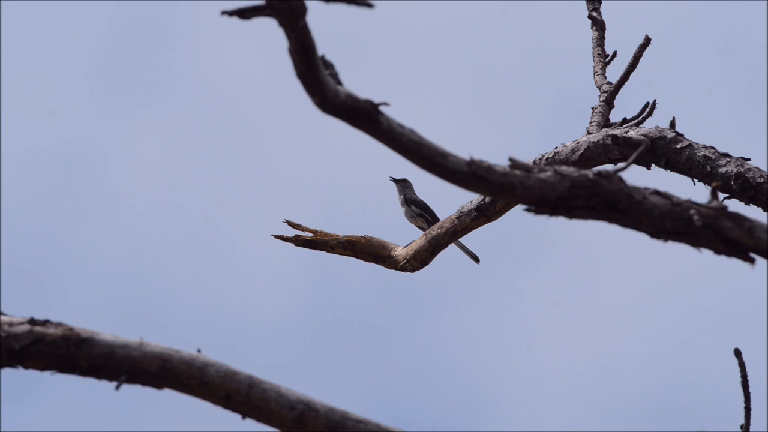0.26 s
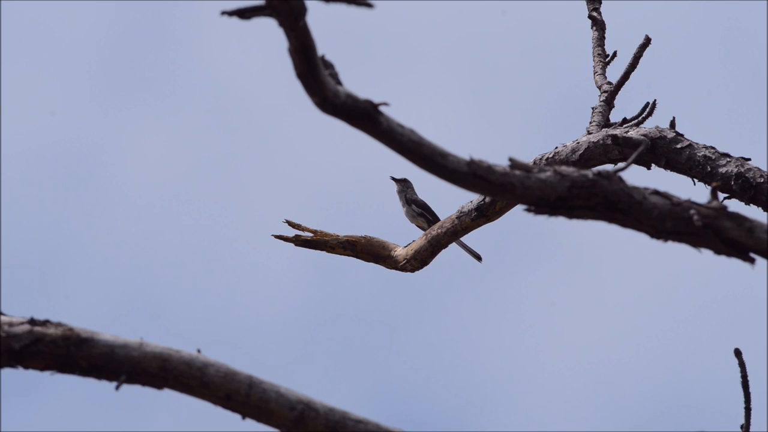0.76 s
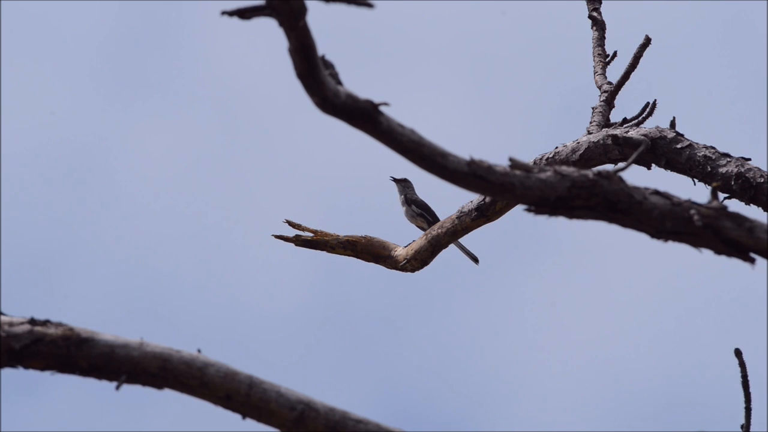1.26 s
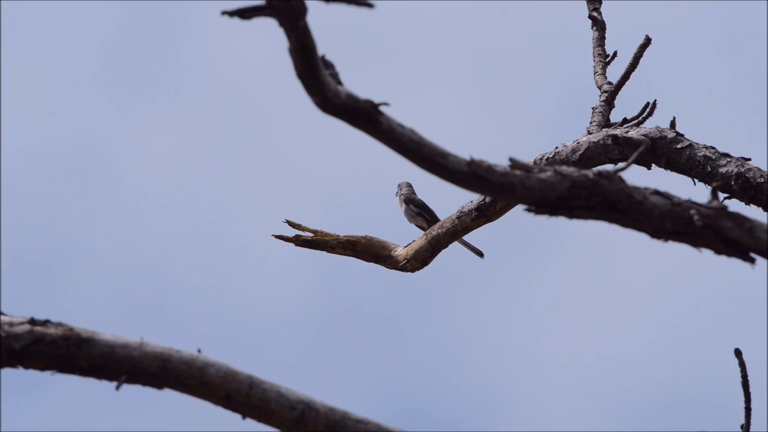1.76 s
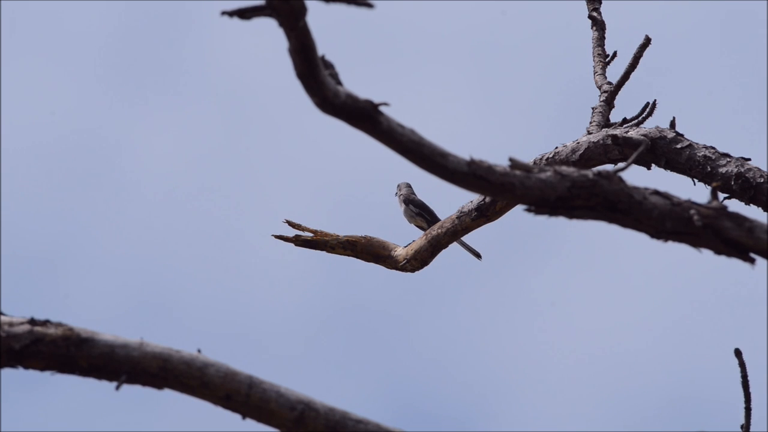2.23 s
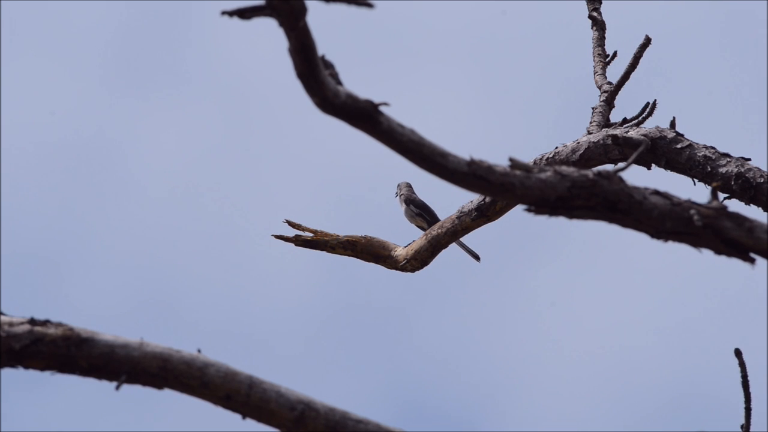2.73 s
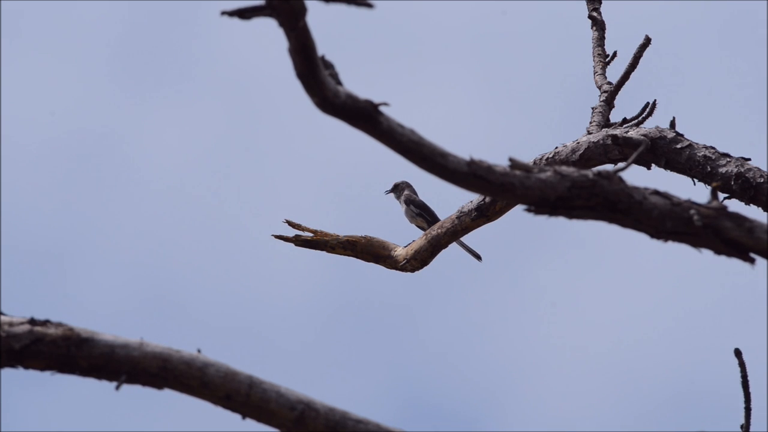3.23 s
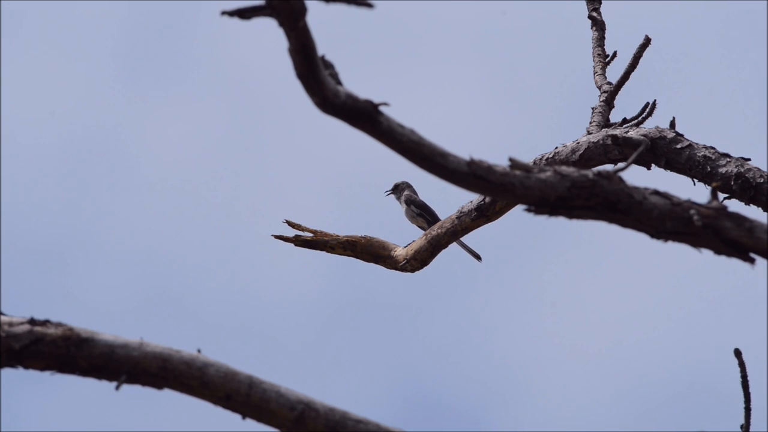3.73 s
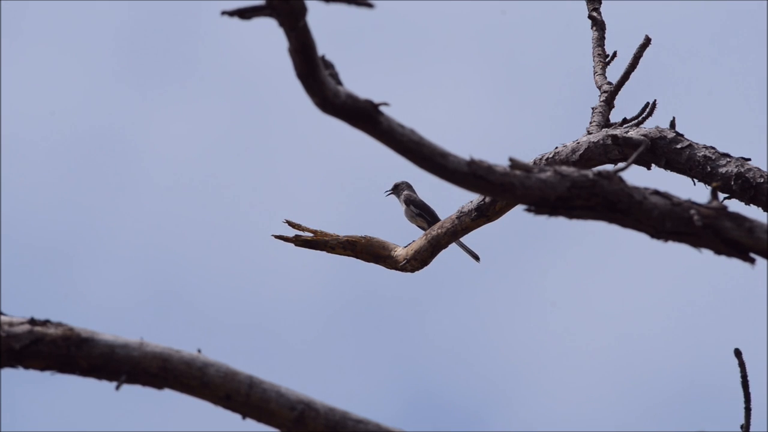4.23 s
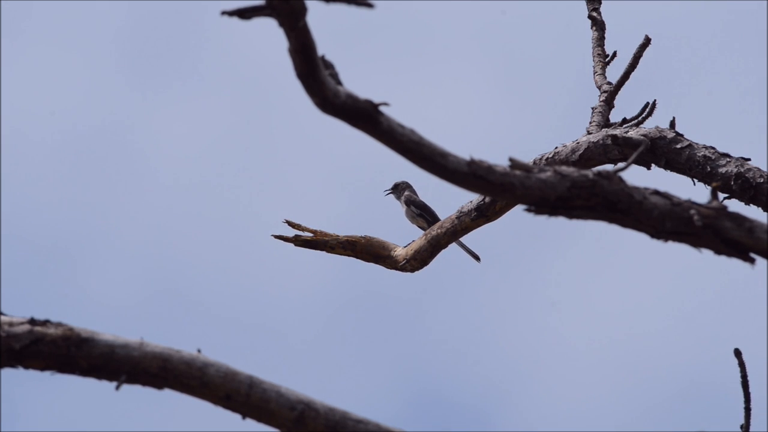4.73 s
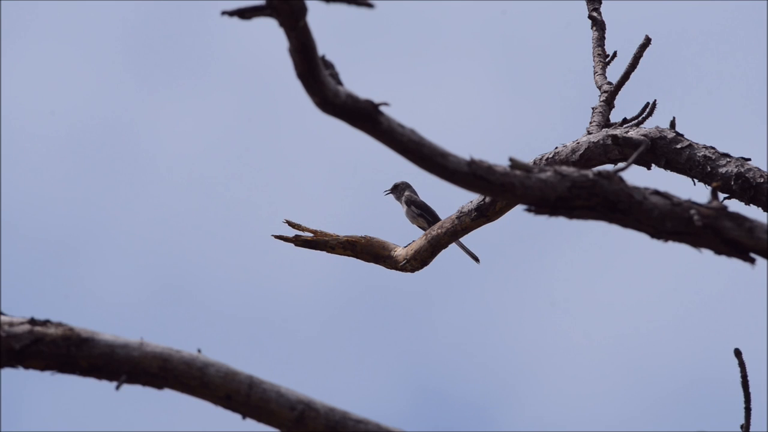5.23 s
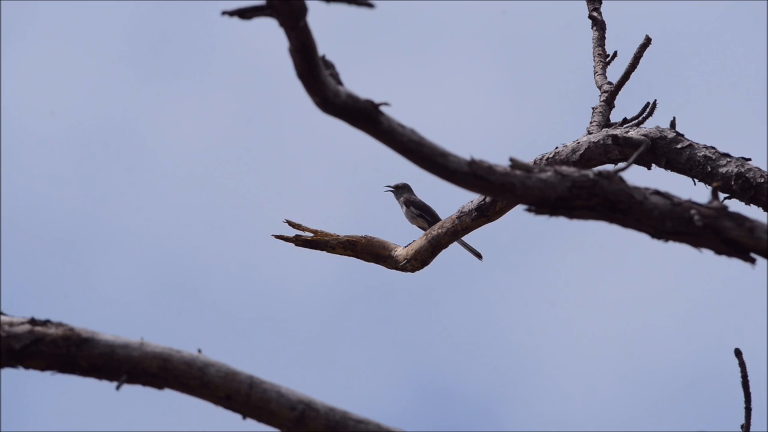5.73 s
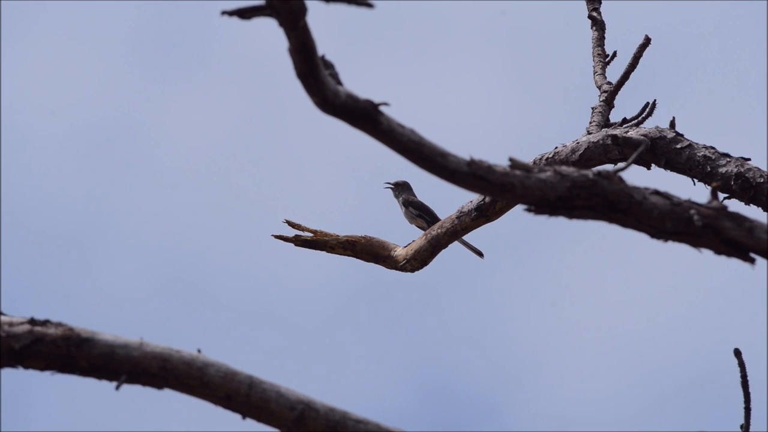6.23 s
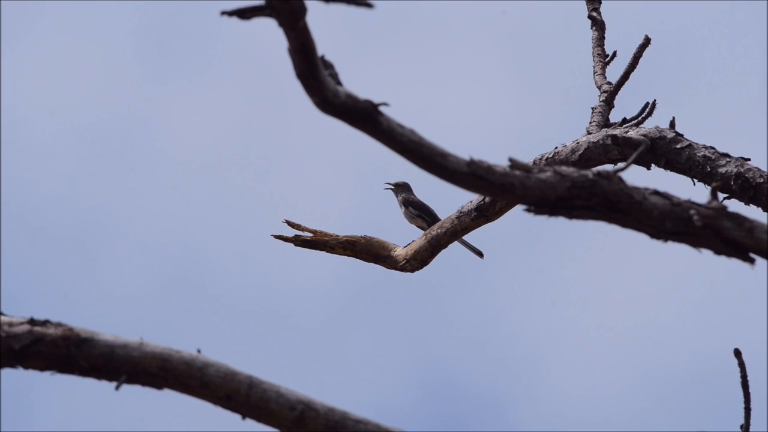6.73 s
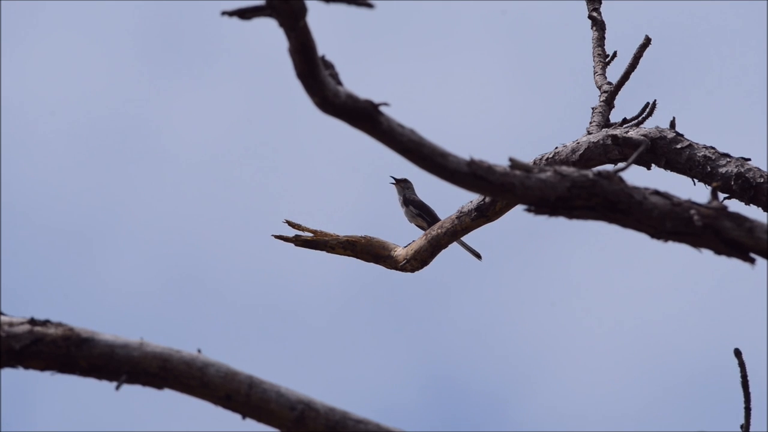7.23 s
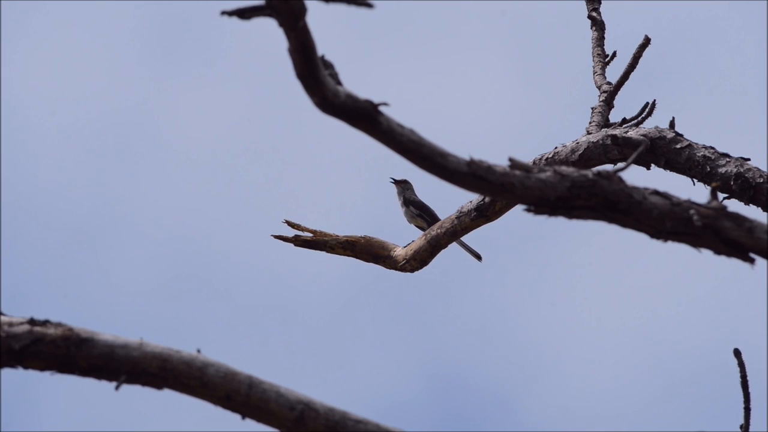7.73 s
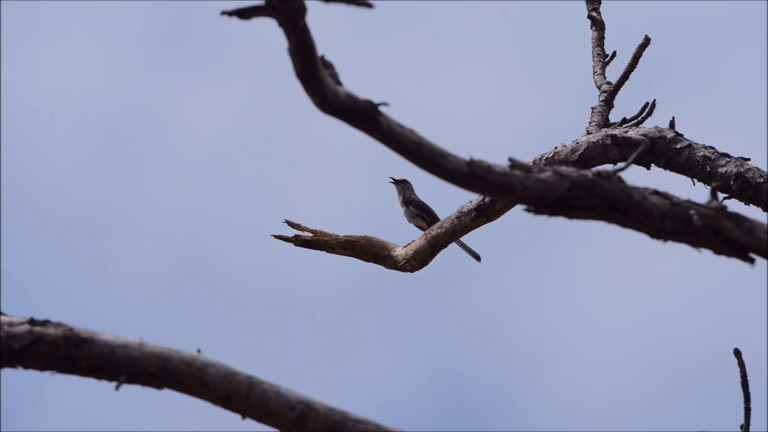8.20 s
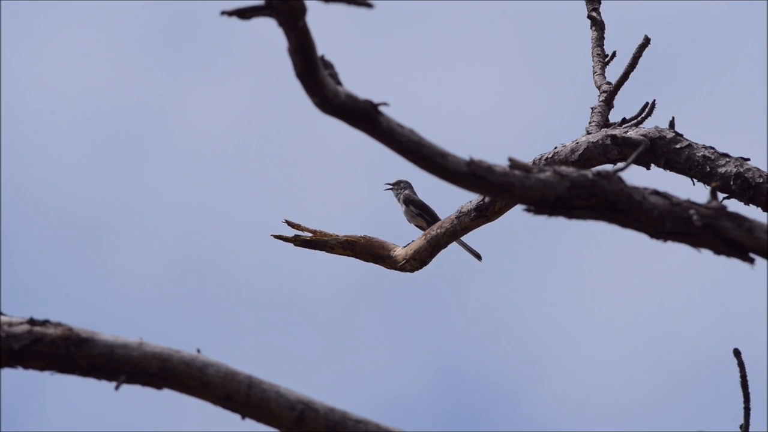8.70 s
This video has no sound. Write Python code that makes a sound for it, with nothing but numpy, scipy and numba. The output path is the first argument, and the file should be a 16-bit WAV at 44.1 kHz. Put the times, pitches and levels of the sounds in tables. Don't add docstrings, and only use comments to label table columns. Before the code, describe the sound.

Rough pulsed bird churrs give way to sliding whistles and harsh tumbling notes over soft leaf hiss, insect scrapes and growing low wind thumps.

```python
import sys
import numpy as np
from scipy import signal
from scipy.fft import rfft, irfft
from scipy.io import wavfile
from scipy.ndimage import uniform_filter1d
from numba import njit

SR = 44100
rng = np.random.default_rng(int(sys.argv[2]) if len(sys.argv) > 2 else 0)


def voltage_ratio(decibels):
    exponent = np.asarray(decibels, float) / 20
    return 10 ** exponent


def put_to_file(sound):
    columns = np.atleast_2d(sound).T
    safe = np.clip(columns, -1, 1)
    whole_steps = np.round(safe * 32767)
    wavfile.write(sys.argv[1], SR, whole_steps.astype(np.int16))


N = 395136


def unit(x):
    return x / np.sqrt(np.mean(x ** 2))


def walk(rate_hz):
    hold = int(SR / rate_hz)
    steps = np.repeat(rng.standard_normal(N // hold + 1), hold)
    return 1.29 * uniform_filter1d(uniform_filter1d(steps, hold), hold)[:N]


@njit
def svf(x, hz, damp):
    low, band, b, l = np.empty(len(x)), np.empty(len(x)), 0., 0.
    for i in range(len(x)):
        g = np.tan(np.pi * hz[i] / SR)
        v = (b + g * (x[i] - l)) / (1 + g * (g + damp))
        low[i], band[i] = l + g * v, damp * v
        b, l = 2 * v - b, l + 2 * g * v
    return low, band


def add(out, x, start_s):
    i = int(start_s * SR)
    a, b = max(i, 0), min(i + len(x), N)
    out[a:b] += x[a - i:b - i]


def syrinx(hz, size, over, rough, third_db=-15.5, high_db=-13):
    phase = 2 * np.pi * (np.cumsum(hz) / SR + rng.random())
    noise = uniform_filter1d(rng.standard_normal((2, len(hz))), int(.0012 * SR))
    shake = rough * noise * np.sqrt(0.00062 * SR)
    upper = np.sin(2 * phase) + voltage_ratio(third_db) * np.sin(3 * phase)
    upper += voltage_ratio(high_db) * (np.sin(4 * phase) + np.sin(6 * phase))
    return size * ((1 + shake[0]) * np.sin(phase) + over * (1 + 5.3 * shake[1]) * upper)


def throat(hz):
    return voltage_ratio(-76 * np.clip(np.log2(2 * hz / 3360), 0, .6))


def strokes(rows, length_s, glide_hz, late, blunt, over, rough, reach=2.7, curve=0.3):
    out, middle_hz = np.zeros(N), np.median(np.transpose(rows)[2])
    variation = np.exp(.08 * rng.standard_normal(len(rows)))
    for (centre_s, db, hz), vary in zip(rows, variation):
        u = np.linspace(0, 1, int(length_s * hz / middle_hz * SR))
        puff = np.abs(np.sin(np.pi * u ** late)) ** blunt
        u = u - .5 ** (1 / late)
        path_hz = hz + glide_hz * (hz / middle_hz) ** reach * vary * (u + curve * u ** 2)
        tone = syrinx(path_hz, voltage_ratio(db) * puff, over(path_hz), rough)
        add(out, tone, centre_s + u[0] * len(u) / SR)
    return out


def glides(rows, bend, rise, fall, rough):
    out = np.zeros(N)
    for start_s, length_s, first_hz, last_hz, db, *over_db in rows:
        u = np.linspace(0, 1, int(length_s * SR))
        hz = last_hz + (first_hz - last_hz) * (1 - u) ** bend
        swell = np.clip(np.minimum(u / rise, (1 - u) / fall), 0, 1)
        size = voltage_ratio(db) * np.sin(np.pi / 2 * swell)
        over = voltage_ratio(over_db[0] if over_db else -40)
        add(out, syrinx(hz, size, over, rough * (first_hz / 3000) ** 2), start_s)
    return out


def held_tone(table):
    s, hz, db = np.transpose(table)
    t = np.arange(s[0], s[-1], 1 / SR)
    waver = walk(57.8)[:len(t)]
    size = np.sqrt(2) * voltage_ratio(np.interp(t, s, db) + 2.4 * waver) * signal.windows.tukey(len(t), .03)
    hz = uniform_filter1d(np.interp(t, s, hz), int(0.0068 * SR)) * (1 + 0.00346 * waver)
    out = np.zeros(N)
    add(out, syrinx(hz, size, voltage_ratio(-3) * throat(hz), .16, third_db=-10), s[0])
    return out


def long_churr(start_s, top_s, period_s, db, top_hz):
    # floor_hz, hook_hz, level_db
    pulses = [(1800, 280, 1), (1733, 260, -.5), (1665, 130, -3.5), (1624, 20, -8.5)]
    # place (0-1), hook_share (0-1), level_db
    hook = [(.14, .25, -5.5), (.4, 0.19, -2.5), (.88, 1, -0.5), (1, 1.05, -16)]
    climb_hz = 476
    drift_hz = 60.2 * (start_s > 3.5)
    rows = [(start_s, top_hz - climb_hz, db - 6), (start_s + .004, top_hz - .85 * climb_hz, db - 7.0),
            (top_s - .004, top_hz - 70, db + 2.0), (top_s, top_hz, db - 5.5)]
    variation = rng.standard_normal((len(pulses), 2))
    for k, ((floor_hz, hook_hz, step_db), vary) in enumerate(zip(pulses, variation)):
        begin_s = rows[-1][0]
        length_s = period_s * (1 if k else .76)
        rows += [(begin_s + place * length_s, floor_hz + drift_hz + share * hook_hz + 20 * vary[0],
                  db + step_db + dip_db + 1.4 * vary[1]) for place, share, dip_db in hook]
    s, hz, level_db = np.transpose(rows)
    t, out = np.arange(s[0], s[-1], 1 / SR), np.zeros(N)
    path_hz = uniform_filter1d(np.interp(t, s, hz), int(0.0027 * SR))
    size = np.sqrt(2) * voltage_ratio(np.interp(t, s, level_db)) * signal.windows.tukey(len(t), .06)
    over = voltage_ratio(-8.5 - 100.32 * np.clip(np.log2(path_hz / 1660), 0, .3))
    add(out, syrinx(path_hz, size, over, 0.13), s[0])
    return out


def long_churrs():
    # start_s, top_s, pulse_period_s, rms_db, top_hz
    calls = [(0.517, 0.541, 0.014, -22.5, 2410), (1.465, 1.487, 0.02, -24.5, 2445),
             (1.604, 1.627, 0.021, -25, 2407), (1.739, 1.761, 0.022, -25.5, 2390),
             (1.882, 1.906, 0.02, -25.5, 2433), (2.302, 2.324, 0.022, -27, 2430),
             (2.45, 2.469, 0.024, -27, 2275), (2.597, 2.622, .022, -25.5, 2300),
             (2.997, 3.016, .023, -26.5, 2400), (3.158, 3.179, 0.024, -27, 2300),
             (3.303, 3.318, 0.026, -25, 2260), (3.689, 3.711, 0.024, -26, 2350),
             (3.848, 3.87, .023, -26.5, 2284)]
    return sum(long_churr(*row) for row in calls)


def quick_churrs():
    # place (0-1), level_db
    shape = [(0, -6), (0.169, -0.5), (.36, 0.5), (.57, 1), (.79, 0.5), (1, -4.5)]
    # start_s, length_s, level_db, lead_hz, body_hz
    calls = [
        (-.008, 0.068, -24, 2400, 2250),
        (.679, .067, -23.5, 2240, 2095),
        (.83, .068, -22.5, 2340, 2120),
        (.982, .068, -24, 2160, 2053),
    ]
    sag_hz = 61.8
    rows = [(s + place * length_s, db + step_db, body_hz - sag_hz * (k - 1) if k else lead_hz)
            for s, length_s, db, lead_hz, body_hz in calls for k, (place, step_db) in enumerate(shape)]
    rows = [row for row in rows if row[0] > 0]
    return strokes(rows, length_s=.017, glide_hz=340, late=1.15, blunt=1.2,
                   over=lambda hz: voltage_ratio(-3) * throat(hz), rough=0.15)


def whistle(start_s, delay_s, stretch, rise_db, accent_db):
    # after_start_s, pitch_hz, level_db
    contour = [(0, 2003, -45), (.022, 2169, -23), (.061, 2363, -17.5), (.078, 2318, -60),
               (.15, 2173, -34.5), (.188, 2097, -27.5), (.24, 1890, -36), (.405, 1675, -42),
               (.418, 1680, -54)]
    break_s, slide_s, slide_hz, accent_s = .09, .188, 2090, .07
    rows = []
    for s, hz, db in contour:
        point_s = start_s + s + delay_s * (s > break_s) + (stretch - 1) * max(s - slide_s, 0)
        point_hz = hz - (stretch - 1) * (slide_hz - hz) * (s > slide_s)
        accent = accent_db * max(1 - abs(s - slide_s) / accent_s, 0)
        rows.append((point_s, point_hz, db + (accent if s > break_s else rise_db)))
    return held_tone(rows)


def whistles():
    # start_s, slide_delay_s, slide_stretch (time and depth), rise_db, slide_accent_db
    calls = [
        (4.445, 0, .98, .5, 0),
        (5.122, 0, 1.02, -.5, -4),
        (5.875, .038, 1.12, 1, 4.5),
    ]
    return sum(whistle(*row) for row in calls)


def turn(drop_s, db, lift, slow):
    # from_drop_s, pitch_hz, level_db, overtone_db
    contour = [(-.125, 1679, -49, -3), (-.095, 1864, -45, -10), (-.07, 1902, -35.5, -10),
               (-.035, 1853, -39.5, -3), (0, 1854, -33.5, 0.5), (.009, 1743, -39, 8.5),
               (.017, 1400, -39.5, 16.5), (.026, 1185, -44.5, 11), (.045, 1028, -54, 11)]
    s, hz, level_db, over_db = np.transpose(contour)
    s = np.where(s > 0, slow * s, s)
    t, out = np.arange(s[0], s[-1], 1 / SR), np.zeros(N)
    size_db = db + np.interp(t, s, level_db) + 1.5 * walk(101)[:len(t)]
    size = np.sqrt(2) * voltage_ratio(size_db) * signal.windows.tukey(len(t), .05)
    path_hz = lift * uniform_filter1d(np.interp(t, s, hz), int(0.0034 * SR))
    second_db = np.interp(t, s, over_db)
    tilt_db = -.8 * (second_db + 4)
    tone = syrinx(path_hz, size, voltage_ratio(second_db), 0.056, third_db=-6 + tilt_db, high_db=-13 + tilt_db / 2)
    add(out, tone, drop_s + s[0])
    return out


def motif(shape, over_db, start_s=0, db=0):
    return [(start_s + s, length_s, first_hz, last_hz, db + peak_db, over)
            for (s, length_s, first_hz, last_hz, peak_db), over in zip(shape, over_db)
            if start_s + s < N / SR]


def tumbles():
    # opening_s, turn_s, level_db, turn_pitch_factor, drop_slowness
    phrases = [
        (6.959, 7.196, -2.2, .965, 1.45),
        (7.749, 7.997, 0, 0.995, 1.15),
        (8.582, 8.862, 0.5, 1.002, 1.25),
    ]
    # delay_s, length_s, first_hz, last_hz, peak_db
    opening = [(0, 0.047, 1553, 1718, -30.5), (.048, 0.013, 1554, 1177, -31),
               (.057, .027, 2340, 2223, -29.5), (.076, 0.04, 3250, 2870, -36),
               (.083, 0.037, 2150, 1910, -42.5)]
    opening_over = [-12.5, -2.5, -20, -18, -25]
    # start_s, length_s, first_hz, last_hz, peak_db
    fan = [(7.232, 0.035, 3360, 2890, -29.5), (7.258, 0.029, 3110, 2730, -32),
           (7.245, .05, 4050, 3700, -42), (7.268, 0.056, 3600, 3110, -30.5), (7.29, .045, 3900, 3500, -37),
           (7.3, 0.068, 2900, 2700, -43), (8.02, 0.071, 3690, 2730, -28), (8.045, .04, 4100, 3600, -38),
           (8.068, .045, 3900, 3070, -31), (8.1, .035, 3950, 3330, -34), (8.105, 0.026, 3310, 2850, -39),
           (8.04, 0.078, 2050, 1640, -42), (8.885, 0.069, 3940, 2810, -26), (8.92, .04, 4270, 3850, -36),
           (8.935, .025, 3720, 3200, -34)]
    # start_s, length_s, first_hz, last_hz, peak_db
    chips = [
        (3.565, 0.016, 3105, 2700, -20.5),
        (3.567, 0.015, 2540, 2410, -25),
        (3.579, 0.017, 2594, 2504, -21),
        (7.25, .047, 2030, 1720, -41),
        (7.89, .045, 3060, 3210, -41),
    ]
    chip_over = [-36, -36, -24, -6, -24]
    rows = motif(chips, chip_over) + [(*row, -22) for row in fan]
    for opening_s, _, db, _, _ in phrases:
        rows += motif(opening, opening_over, opening_s, db)
    turns = sum(turn(*row[1:]) for row in phrases)
    return turns + glides(rows, bend=1.5, rise=0.32, fall=0.056, rough=0.36)


def trill_strokes(table):
    # level_db, pitch_hz
    shape = [(-9.5, -330), (-1, -130), (0, 1), (-1.5, -1), (-8, -91)]
    rows = [(s + (k - 2) * period_s, db + step_db * (fade if k > 2 else 1), hz + step_hz)
            for s, period_s, db, hz, fade in table for k, (step_db, step_hz) in enumerate(shape)]
    return [row for row in rows if row[0] > 0]


def neighbour():
    # third_stroke_s, period_s, level_db, pitch_hz, fade (0-5)
    loud = [
        (.645, .0157, -11, 3263, 2),
        (.795, .0155, -10, 3128, 1.4),
        (.949, .0152, -12, 3380, 1.5),
    ]
    # third_stroke_s, period_s, level_db, pitch_hz, fade (0-5)
    soft = [
        (.008, .016, -22.5, 3180, 0.63),
        (.168, .0165, -29.5, 3235, 4.7),
        (.316, .017, -30, 3160, 3.1),
        (1.147, .017, -30, 3070, 1.1),
        (1.3, .016, -30.5, 3130, 4.2),
    ]

    def over(hz):
        notch_db = -11 * np.exp(-((2 * hz - 6000) / 260) ** 2)
        return voltage_ratio(-19 + notch_db - np.maximum(2 * hz - 6800, 0) / 90)

    out = strokes(trill_strokes(loud), length_s=.0165, glide_hz=-900, late=0.72, blunt=1.3,
                  over=over, rough=0.29, reach=6.9, curve=-0.31)
    return out + strokes(trill_strokes(soft), length_s=.0165, glide_hz=-640, late=.85, blunt=0.84,
                         over=over, rough=0.24, reach=3.8, curve=-0.27)


def far_birds():
    # s, pitch_hz, level_db
    thin_call = [(2.772, 6460, -40), (2.794, 6570, -46), (2.85, 6540, -38), (2.864, 6540, -46),
                 (2.94, 6470, -43), (2.965, 6705, -33), (3.015, 6700, -30), (3.045, 6670, -39.5),
                 (3.13, 6600, -51)]
    # start_s, length_s, first_hz, last_hz, peak_db
    faint_notes = [(4.135, 0.053, 3620, 5130, -44.5), (4.355, 0.032, 8640, 7800, -44),
                   (5.84, 0.23, 3930, 3920, -56), (6.15, 0.19, 4120, 4080, -51),
                   (6.225, 0.041, 3130, 3100, -46), (6.46, 0.16, 4110, 4160, -49),
                   (6.63, 0.048, 3770, 3640, -44), (6.71, .12, 4320, 4060, -50),
                   (6.885, 0.087, 4160, 4220, -48), (7.01, 0.049, 3960, 4260, -50),
                   (7.13, 0.055, 4130, 4330, -44), (7.245, 0.1, 4150, 4450, -43.5),
                   (8.525, 0.04, 3300, 3220, -45), (8.54, 0.031, 9000, 6900, -47),
                   (8.672, 0.025, 9100, 6800, -48), (1.045, 0.027, 8100, 7740, -44),
                   (7.665, .04, 3650, 3680, -52), (7.95, .06, 2300, 2220, -44),
                   (8.29, 0.2, 3680, 3530, -52), (8.28, 0.13, 3010, 2860, -49),
                   (6.3, 0.11, 2270, 2210, -37.5), (6.41, .12, 2260, 2170, -44),
                   (4.59, 0.024, 9000, 7500, -45), (6.08, 0.04, 9400, 7500, -53)]
    first_s, period_s, lag_s, settle = 7.356, .0572, .031, .45
    flicks = [(first_s + k * period_s + lag_s * (1 - settle ** k), -43, 4250) for k in range(11)]
    out = strokes(flicks, length_s=0.04, glide_hz=650, late=1.11, blunt=0.98, over=lambda hz: 0, rough=.1)
    return out + held_tone(thin_call) + glides(faint_notes, bend=.9, rise=0.05, fall=0.11, rough=0.25)


def grove(x):
    trees_t60_s, wall_s, trunk_s = 0.29, .345, .066
    t = np.arange(int(.7 * SR)) / SR
    haze = rng.standard_normal(len(t)) * voltage_ratio(-60 * t / trees_t60_s) * np.clip(t / 0.0061, 0, 1)
    wall = rng.standard_normal(len(t)) * (t > wall_s) * np.exp((wall_s - t) / 0.03)
    tail = voltage_ratio(-8) * haze / np.linalg.norm(haze) + voltage_ratio(-24) * wall / np.linalg.norm(wall)
    tail[int(trunk_s * SR)] += voltage_ratio(-17)
    dull_tail = svf(tail, np.full(len(t), 5000.), 0.99)[0]
    return x + signal.fftconvolve(x, dull_tail)[:N]


def wing_ring(hz, damp):
    centre = np.full(N, hz)
    return unit(svf(svf(rng.standard_normal(N), centre, damp)[1], centre, damp)[1])


def insects():
    # first_s, period_s, chirp_count
    runs = [(.014, .169, 4), (.711, .192, 3), (1.315, .219, 5), (2.377, .191, 4), (3.19, .243, 4),
            (4.039, .27, 2), (4.452, .192, 3), (5.013, .171, 5), (5.926, .182, 4), (6.677, .217, 4),
            (7.587, .185, 6), (8.87, .18, 1)]
    teeth, t = np.full(N, voltage_ratio(-58.0)), np.arange(int(.085 * SR)) / SR
    chirps_s = [s + k * period_s for s, period_s, count in runs for k in range(count)]
    levels_db = np.linspace(-52.5, -47, len(chirps_s)) + 1.8 * rng.standard_normal(len(chirps_s))
    burst = np.hanning(len(t)) * (1 + 0.45 * np.sin(2 * np.pi * 110 * t))
    for s, db in zip(chirps_s, levels_db):
        add(teeth, voltage_ratio(db) * burst, s - .042)
    answer = np.roll(teeth, int(.075 * SR))
    return teeth * voltage_ratio(-1.0) * wing_ring(10380.0, 0.0685) + answer * voltage_ratio(-6) * wing_ring(9100.0, 0.052)


def twigs():
    # start_s, level_db
    ticks = [
        (4.0444, -24),
        (4.08, -19),
        (4.1041, -14),
        (4.1184, -23),
    ]
    out, t = np.zeros(N), np.arange(200) / SR
    for s, db in ticks:
        add(out, voltage_ratio(db - 3) * rng.standard_normal(len(t)) * np.exp(-t / 0.0007), s)
    return svf(svf(out, np.full(N, 2500.), 2.2)[1], np.full(N, 8000.), 1.4)[0]


def gust_level_db():
    # arrives_s, holds_s, arrival_db, drift_db
    gusts = [(0.044, 0.28, -44.5, 8), (0.416, 0.51, -41, 21), (1.125, 0.15, -22, -10),
             (1.313, 0.32, -31.5, 7.5), (1.821, 0.0093, -19, 0), (1.989, .01, -26.5, 2.5),
             (2.197, 0.56, -52.5, 13), (3.011, 0.4, -25.5, -21), (3.847, 0.0094, -28.5, 0.5),
             (4.138, 1.9, -22, -2), (6.306, 0.0079, -17, 2.5), (6.746, .55, -22, 7.5),
             (7.425, 0.0093, -10, -4), (7.515, 0.28, -23.5, 4), (7.91, 0.068, -12.5, -3),
             (8.107, 0.15, -13, -6), (8.352, 0.57, -13.5, 1.5), (8.63, 0.17, -10.5, -1)]
    calm_db, rise_db_per_s, fall_db_per_s = -43, 110, 139
    t, out = np.arange(N) / SR, np.full(N, float(calm_db))
    for s, hold_s, db, drift_db in gusts:
        edge_db = rise_db_per_s * np.maximum(s - t, 0) + fall_db_per_s * np.maximum(t - s - hold_s, 0)
        held = np.clip((t - s) / max(hold_s, 1 / SR), 0, 1)
        out = np.maximum(out, db + drift_db * held - edge_db)
    return out


def wind():
    # s, peak_db, hz
    buffets = [(1.791, -15, 148), (4.104, -17, 123.4), (5.149, -6, 170), (6.326, 4, 158),
               (6.974, -6.5, 158), (7.442, -19, 72), (8.086, 5, 116), (8.384, 2.5, 99), (8.63, 8.5, 136),
               (8.818, -4, 91)]
    db = gust_level_db()
    corner_hz = np.clip(140 * voltage_ratio(0.37 * (db + 23.0) + 1.47 * walk(30)), 40, 450)
    x = svf(svf(rng.standard_normal(N), corner_hz, 1.48)[0], 1.42 * corner_hz, 1.25)[0]
    x = svf(x, np.full(N, 85.), 1.34)[1] * voltage_ratio(4.87 * walk(35))
    power = uniform_filter1d(uniform_filter1d(x ** 2, 4000), 4000)
    out = x / np.sqrt(power) * voltage_ratio(db + 1.5)
    for s, peak_db, hz in buffets:
        t = np.arange(int(3.0 * SR / hz)) / SR
        thump = np.hanning(len(t)) ** 2 * np.sin(2 * np.pi * hz * t)
        add(out, voltage_ratio(peak_db - 4.5) * thump, s - .001)
    return out


def air():
    # hz, density_db_per_hz
    spectrum = [(20, -5.5), (60, -4), (150, -5), (400, -9), (1000, -13.5), (2000, -17), (4000, -18.5),
                (8000, -19), (10300, -20), (11200, -24), (15800, -30)]
    hz, db = np.transpose(spectrum)
    f = np.maximum(np.arange(N // 2 + 1) * SR / N, 1)
    colour, swell, out = voltage_ratio(np.interp(np.log(f), np.log(hz), db)), walk(0.82), 0
    for octave in np.arange(4, 15):
        share = np.cos(np.pi / 2 * np.clip(np.log2(f) - octave, -1, 1))
        leaves_db = (octave > 11) * np.linspace(-4, 0, N)
        drift = voltage_ratio(0.026 * swell + 0.5 * walk(9) + leaves_db)
        out = out + drift * irfft(rfft(rng.standard_normal(N)) * colour * share, N)
    return unit(out) * voltage_ratio(-40)


def scene():
    song = long_churrs() + quick_churrs() + whistles() + tumbles()
    return (grove(song + neighbour() + far_birds()) + insects() + twigs() + wind() + air())[None]


def treble_dropouts(x):
    centres = [0.113, 0.195, 0.302, 0.581, 0.667, 1.029, 1.541, 1.924, 2.052, 2.115, 2.159, 2.202, 2.287,
               2.436, 2.757, 2.821, 2.905, 3.29, 3.886, 3.993, 4.145, 4.848, 5.359, 5.424, 7.15, 7.216,
               7.471, 8.794], [1.167, 3.445, 3.55, 4.352, 5.547, 5.739, 5.802, 7.07]
    out, hop = x.copy(), 1024
    for frames, times in enumerate(centres, 1):
        spread = np.r_[1, np.zeros(3 * hop // 4 - 1), frames - 1]
        window = np.convolve(np.hanning(3 * hop // 2), spread)
        hz = np.arange(len(window) // 2 + 1) * SR / len(window)
        band = (16 * np.log2(hz + 2000)).astype(int)
        for s in times:
            i = int(s * SR) - (len(window) - (2 - frames) * 3 * hop // 4) // 2
            spectrum = rfft(x[i:i + len(window)] * window)
            power = np.bincount(band, np.abs(spectrum) ** 2) / np.maximum(np.bincount(band), 1)
            quiet = power < 8 * np.median(power[band])
            odds = np.where(np.arange(len(power)) > band[-1] - 14, 1, .95 - .17 * frames)
            lost = quiet & (rng.random(len(power)) < odds)
            removed = irfft(spectrum * lost[band] * (hz > 2400 / frames), len(window))
            add(out, -.96 * removed, i / SR + .1 / SR)
    return out


def low_pass(x):
    return signal.sosfilt(signal.butter(12, 15930, fs=SR, output="sos"), x)


def record(dry):
    x = signal.sosfilt(signal.butter(2, 60, "high", fs=SR, output="sos"), dry[0])
    x = x / (1 + x ** 4) ** .25
    return low_pass(treble_dropouts(x)[None])


dry = scene()
out = record(dry)
put_to_file(out)
```